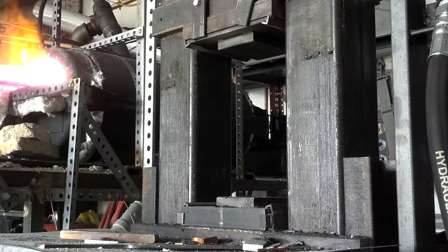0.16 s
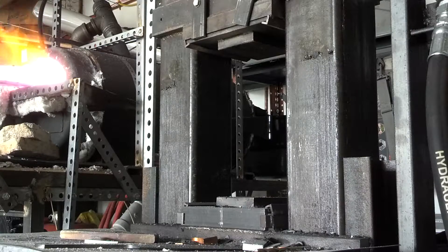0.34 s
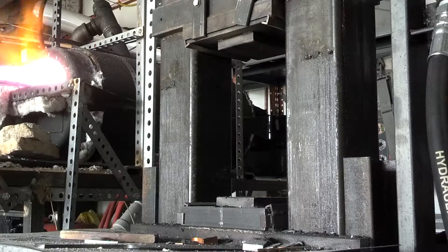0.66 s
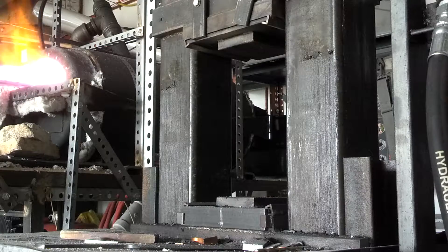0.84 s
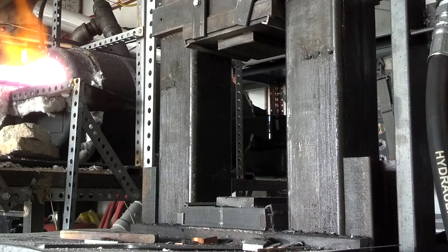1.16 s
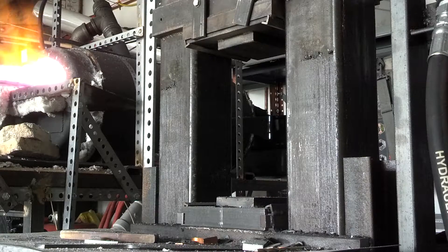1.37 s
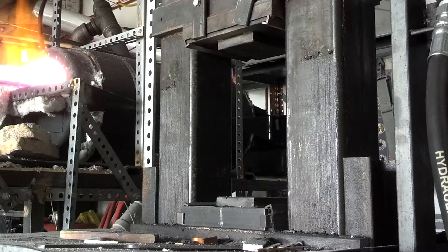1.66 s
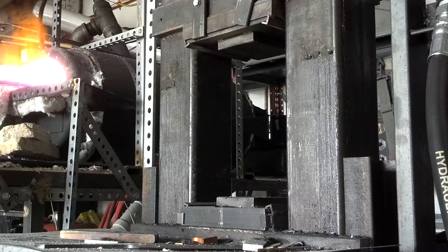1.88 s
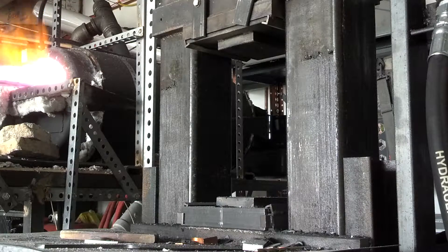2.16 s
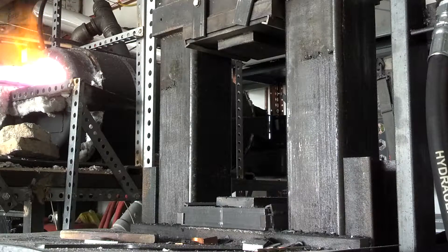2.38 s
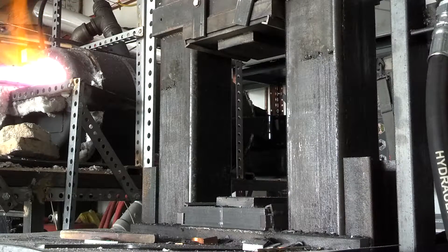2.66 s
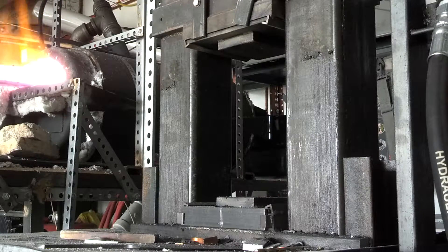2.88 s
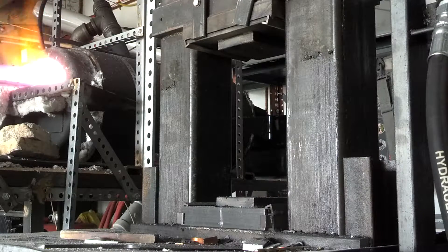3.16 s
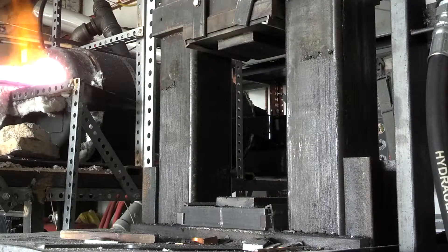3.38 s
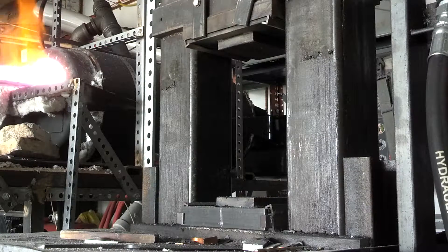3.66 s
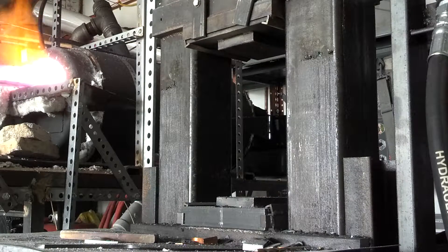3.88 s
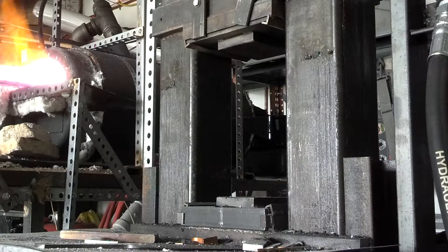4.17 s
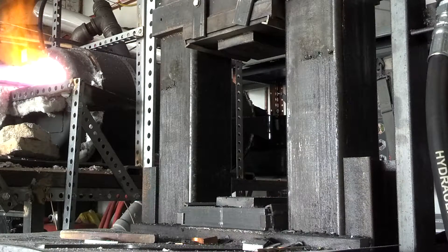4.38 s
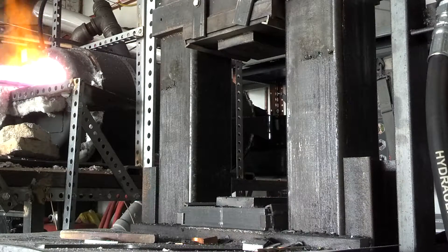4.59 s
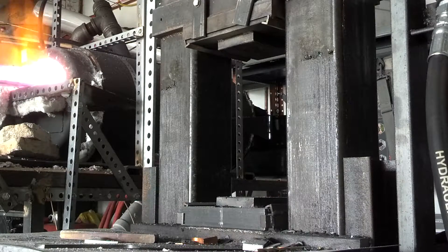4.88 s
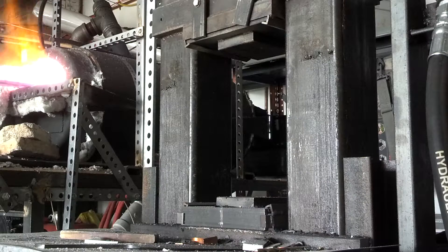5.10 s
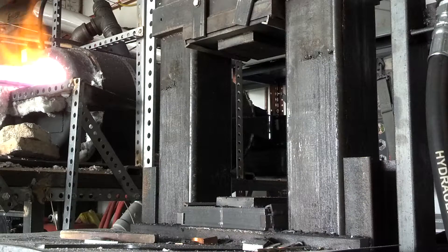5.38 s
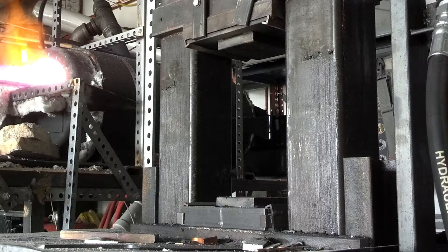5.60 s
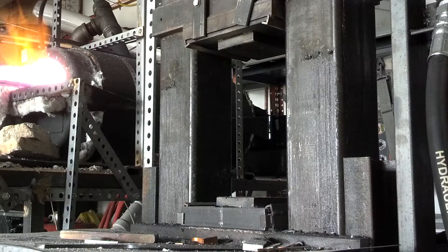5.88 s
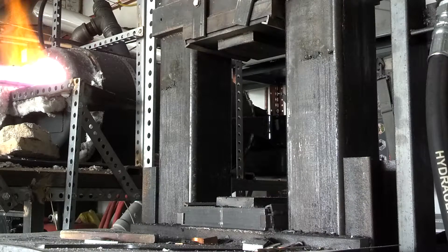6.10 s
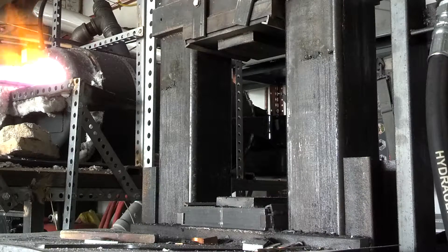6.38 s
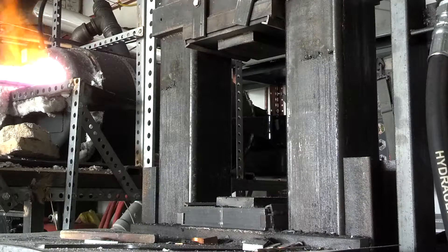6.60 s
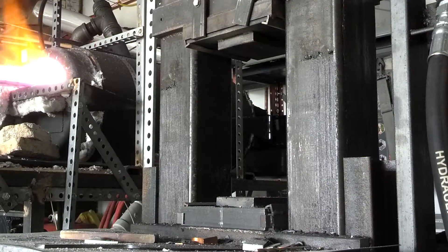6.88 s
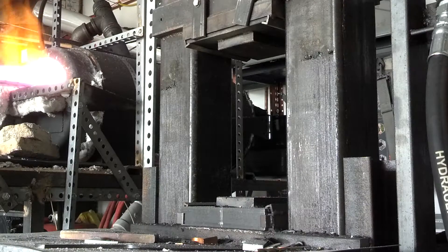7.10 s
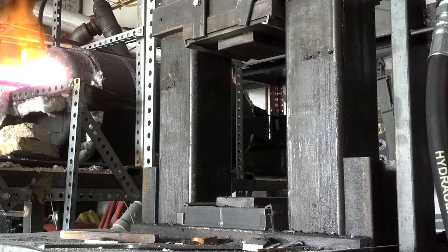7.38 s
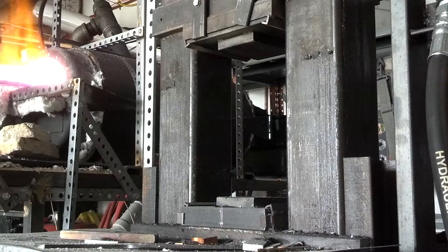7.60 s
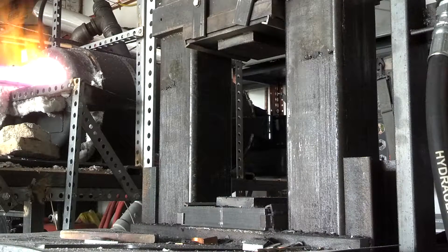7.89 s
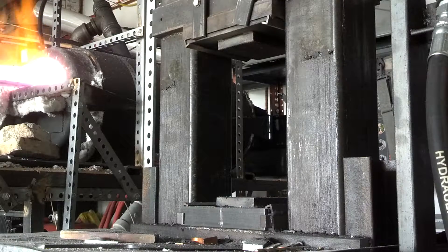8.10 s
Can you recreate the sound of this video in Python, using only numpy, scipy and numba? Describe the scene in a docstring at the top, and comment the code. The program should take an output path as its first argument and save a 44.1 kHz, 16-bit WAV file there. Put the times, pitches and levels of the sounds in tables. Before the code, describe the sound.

A gas forge roars for the whole eight seconds: a dense low boom, hollow with chamber resonances, fluttering quickly, with a thin steady hiss above. Out of sight, a hammer hits hot steel on an anvil, slightly left. Seven blows come from 0.2 to 1.9 s, about 3.6 a second, each a dull thud near 500 Hz with a short clank, a modest crack and a faint thin ring. Weaker, uneven taps follow at 2.4 to 2.7, then three firmer blows at 2.9 to 3.5. After a pause, four strokes run from 4.1 to 5.0. A longer gap lets the roar swell; two light taps fall around 5.9 and 6.0. A last regular run goes from 6.5 to 8.1, with brighter clanks. Small metal chinks colour some hits. Stereo microphones catch short workshop reflections, while automatic gain ducks the roar under loud blows.

```python
"""A gas forge roars in a workshop: coloured noise lifted by chamber resonances booms, its treble hisses.
Over it come runs of sharp hammer blows on hot steel: a dull thud made of sinking swings,
and a clank, a crack and a thin ring made of damped modes and short noise. Light metal ticks and
chinks are bursts of bright noise. An automatic gain control ducks the roar at loud blows
and lets it swell back in the pauses."""
import sys
import numpy as np
from scipy import signal
from scipy.fft import rfft, irfft
from scipy.io import wavfile
from scipy.ndimage import uniform_filter1d
from numba import njit

SR = 44100
rng = np.random.default_rng(int(sys.argv[2]) if len(sys.argv) > 2 else 0)


def generate_wav(signal):
    """Clip the signal to [-1, 1] and save it as 16-bit WAV at the path in sys.argv[1]."""
    frames = np.transpose(np.atleast_2d(signal))
    scaled = np.clip(frames, -1, 1) * 32767
    pcm = np.round(scaled).astype(np.int16)
    wavfile.write(sys.argv[1], SR, pcm)


N = 363825
AGE = np.arange(int(0.6 * SR)) / SR  # seconds since a contact
BODY_S = 0.045  # first moments of a contact, over which its level is set


def undb(db):
    """Decibels to gain."""
    return 10 ** (np.asarray(db) / 20)


def along(table, hz):
    """Read (Hz, value) points on a log-frequency axis."""
    f, value = np.transpose(table)
    return np.interp(np.log(hz + 1), np.log(f), value)


def unit(x):
    """Scale to rms 1."""
    return x / np.sqrt(np.mean(x ** 2))


def pan(db):
    """Left and right gains for a level difference, left minus right in dB."""
    return undb(np.array([[db], [-db]]) / 2)


def walk(rate):
    """Random levels held 1 / rate seconds and smoothed twice; spread near 1."""
    hold = int(SR / rate)
    steps = np.repeat(rng.standard_normal(N // hold + 1), hold)
    smooth = uniform_filter1d(uniform_filter1d(steps, hold), hold)
    return 0.73 * smooth[:N]


def add(out, s, sound):
    """Mix a sound in at a time in seconds."""
    start = int(s * SR)
    out[:, start:start + sound.shape[1]] += sound[:, :N - start]


def bins(size):
    """Frequencies of a spectrum in Hz."""
    return np.arange(size // 2 + 1) * SR / size


# Phase by which the left microphone leads the right.
# Each row: frequency in Hz, phase in radians.
LEFT_LEAD = [(60, -.4), (190, -1.5), (380, 0), (1500, .2), (2000, 3), (2800, 3.4), (3400, 6.1), (4100, 6.6),
             (4700, 9.3), (5100, 9.8), (5800, 12.6), (7000, 15.7), (8500, 18.8)]


def noise_pair(gain, likeness, size):
    """Coloured noise as two spaced microphones hear it: partly alike, the right one shifted in phase."""
    hz = bins(size)
    left, other = rfft(rng.standard_normal((2, size)))
    alike = np.clip(along(likeness, hz), 0, 1)
    right = alike * left + np.sqrt(1 - alike ** 2) * other
    right = right * np.exp(-1j * along(LEFT_LEAD, hz))
    return unit(irfft(np.array([left, right]) * gain, size))


# Broad colour of the flame noise, before resonances.
# Each row: frequency in Hz, relative level in dB per Hz.
FLAME_COLOUR = [(32, -48), (65, -47), (100, -17), (170, -1), (380, -6), (720, -14.5), (1000, -24.5),
                (2000, -30), (3200, -41.5), (4000, -48), (5100, -61.5), (7500, -57.5), (10000, -68),
                (15000, -62)]
# Resonances of the chamber and the shop that lift the flame noise.
# Each row: centre in Hz, width in Hz, lift in dB.
CHAMBER_RESONANCES = [(175.4, 34.5, 8.5), (220, 10.7, 7.5), (240, 8.7, 7.5), (305.3, 15, 10.5),
                      (332.8, 16, 4), (382, 16.3, 9), (414, 11, 7.5), (503, 13, 4), (675, 45, 6.5),
                      (897, 32, 8.5), (1118, 20, 11.5), (1391, 21, 11), (1564, 51, 7), (1947, 24, 8.5),
                      (2116, 22, 12), (2746, 170, 17)]
# Where the forge sits in the stereo field.
# Each row: frequency in Hz, left minus right in dB.
FLAME_SIDES = [(60, 2), (110, 0), (185, 5), (230, 2), (310, 1), (460, 4), (700, -1), (1300, .5), (4400, 0),
               (7500, 4), (12000, 1.5)]
# Likeness of the flame at the two microphones.
# Each row: frequency in Hz, coherence from 0 to 1.
FLAME_COHERENCE = [(60, 1), (200, 0.68), (350, 0.92), (480, 0), (700, 0.89), (1300, 0.98), (1800, 0.47),
                   (2400, 0.99), (3700, 0.72), (5000, 1), (15000, 0)]
# Slow swell of the flame's boom, under its quick flutter.
# Each row: time in seconds, level change in dB.
BOOM_SWELL = [(0, -2), (.5, 0), (1.3, -.5), (2.1, 1), (2.6, 1.5), (3.3, 0), (4.2, 1.5), (4.6, -1.5),
              (5.2, 1), (5.8, .5), (6.6, 1), (7.4, 0.5), (8.25, 0)]


def forge(level_db=-21, flutter_db=1.7, hiss_flutter_db=0.07):
    """Turbulent flame rings the chamber; the boom flutters quickly, the jet's hiss stays nearly steady."""
    hz = bins(N)
    lift = sum(db / (1 + (2 * (hz - f) / width) ** 2) for f, width, db in CHAMBER_RESONANCES)
    sides = np.array([[0.5], [-0.5]]) * along(FLAME_SIDES, hz)
    # broad cut (Hz, dB) that makes room for the resonances
    valleys = along([(90, 2.5), (170, 2.5), (400, 0.5), (2150, 3.0),
                     (2500, 8.0), (3000, 6.5), (3500, -2.0)], hz)
    colour = undb(along(FLAME_COLOUR, hz) + lift - valleys + sides)
    roar = noise_pair(colour, FLAME_COHERENCE, N)
    # split into boom and hiss around 650 Hz
    boom = signal.sosfiltfilt(signal.butter(2, 650, fs=SR, output="sos"), roar)
    swell_db = np.interp(np.arange(N) / SR, *np.transpose(BOOM_SWELL))
    flame = boom * undb(flutter_db * walk(22) + swell_db)
    jet = (roar - boom) * undb(hiss_flutter_db * walk(7.1))
    return undb(level_db) * (flame + jet)


def blow_level(sound, db):
    """Set the rms level of a contact's first moments."""
    return sound * undb(db) / np.sqrt(np.mean(sound[:, :int(BODY_S * SR)] ** 2))


# Likeness of contact noise at the two microphones.
# Each row: frequency in Hz, coherence from 0 to 1.
CONTACT_COHERENCE = [(100, .5), (450, 0.56), (800, 0.54), (1200, 1), (1800, 0.095), (2400, 1), (3700, 0.57),
                     (5500, 0.93), (7500, 0.088), (15000, 0.34)]


def burst(colour, rise_s, t60, room_db, room_t60, patchy_db):
    """Noise standing for many crowded modes: it dies quickly, then lingers in the shop."""
    hz = bins(len(AGE))
    # each contact favours other clusters of modes
    grid = np.linspace(0, SR / 2, 2 ** 8)
    patches = patchy_db * np.interp(hz, grid, rng.standard_normal(len(grid)))
    noise = noise_pair(undb(along(colour, hz) + patches), CONTACT_COHERENCE, len(AGE))
    direct = undb(-60 * AGE / t60)
    room = undb(room_db - 60 * AGE / room_t60)
    rise = 1 - np.exp(-(AGE / rise_s) ** 2)
    return blow_level(rise * np.hypot(direct, room) * noise, 0)


def ring(modes, push_s, scatter_db, detune, stagger):
    """Damped modes build up in a push and swing loosely in step at its end, scattered by stagger in radians."""
    hz, db, t60 = np.transpose(modes)[:, :, None]
    # each blow lands on another spot and shares itself out differently
    size, shift, spread, offset = rng.standard_normal((len(modes), 4)).T[:, :, None]
    phase = 2 * np.pi * hz * (1 + detune * shift) * (AGE - push_s) + stagger * offset
    fade = undb(db + scatter_db * size) * np.exp(-np.log(1000) * AGE / t60)
    # reflections turn each mode a little between the microphones
    right_lag = along(LEFT_LEAD, hz) + 0.4 * spread
    left = (fade * np.sin(phase)).sum(axis=0)
    right = (fade * np.sin(phase - right_lag)).sum(axis=0)
    build_up = 1 - np.exp(-(AGE / push_s) ** 2)
    return blow_level(np.array([left, right]) * build_up, 0)


# Early reflections of the thud from floor and benches.
# Each row: delay in seconds, level in dB.
THUD_REFLECTIONS = [(.0089, -4.5), (.0215, -12), (0.0354, -12.5)]


def bump(hz, peak_s, steepness=9, sag=0.12):
    """The anvil gives under the hammer: a few swings swell, sink in pitch and return from near surfaces."""
    age = AGE / peak_s
    swell = (age * np.exp(1 - age)) ** steepness
    pitch = hz * (1 + sag * np.tanh(1 - age))
    phase = 2 * np.pi * np.cumsum(pitch) / SR
    out = np.zeros(len(AGE))
    for delay_s, db in [(0, 0.0081)] + THUD_REFLECTIONS:
        swings = swell * np.sin(phase + rng.uniform(0, 2 * np.pi))
        out += undb(db) * np.interp(AGE - delay_s, AGE, swings, left=0)
    return blow_level(np.array([out, out]), 0)


# Low modes of the anvil on its stand.
# Each row: frequency in Hz, typical level in dB, 60 dB decay in seconds.
STAND_MODES = [(44, -27.5, 0.084), (413.7, 2, 0.27), (442.3, -2.5, 0.24), (478, -6, 0.064),
               (522.4, 2, 0.14), (558, -0.5, 0.28)]
# Noisy part of the thud.
# Each row: frequency in Hz, relative level in dB per Hz.
THUD_COLOUR = [(30, -36), (150, -26.5), (330, -28), (425, 18), (555, 10), (680, 2.5), (1200, -29),
               (3000, -72)]


def stand_ring():
    """Soft hot steel pushes for some milliseconds, so the stand's low modes come late."""
    modes = ring(STAND_MODES, push_s=0.01054, scatter_db=0.5, detune=0.006, stagger=1.16)
    noise = burst(THUD_COLOUR, rise_s=0.0064, t60=0.041, room_db=-5, room_t60=0.28, patchy_db=0.5)
    return modes + undb(-0.5) * noise


def echo(sound, delay_s, echo_db):
    """Add one reflection from the floor or a wall of the shop."""
    late = [np.interp(AGE - delay_s, AGE, side, left=0) for side in sound]
    return sound + undb(echo_db) * np.array(late)


# Middle modes of the anvil on its stand.
# Each row: frequency in Hz, typical level in dB, 60 dB decay in seconds.
ANVIL_CLANK_MODES = [(641, -12.5, 0.064), (669.3, -6.5, 0.18), (704.4, -6, 0.25), (816.3, 0.5, 0.14),
                     (854.6, -3.5, 0.14), (909, -13, 0.21), (1000, -8, 0.2), (1137, -10, 0.25),
                     (1190, -14, 0.31), (1310, -19, .2), (1306, -20.5, 0.1), (1580, -21, 0.16),
                     (1647, -15, 0.13)]
# Noisy part of the clank.
# Each row: frequency in Hz, relative level in dB per Hz.
CLANK_COLOUR = [(350, -29.5), (620, 1.5), (840, 1.5), (1050, -7), (1250, -6), (1450, -15), (1750, -17),
                (2200, -19.5), (2700, -25.5), (6000, -68.5)]


def clank_ring():
    """The anvil's middle modes clank over dense noise, with one reflection from the shop."""
    clank = ring(ANVIL_CLANK_MODES, push_s=0.007, scatter_db=1.0, detune=0.004, stagger=1.1)
    noise = burst(CLANK_COLOUR, rise_s=0.0045, t60=0.032, room_db=14, room_t60=0.27, patchy_db=0.5)
    return echo(clank + undb(3) * noise, delay_s=0.033, echo_db=-13)


# Noisy part of the crack.
# Each row: frequency in Hz, relative level in dB per Hz.
CRACK_COLOUR = [(900, -10), (1500, 2.5), (2000, 8), (2500, 2), (3000, 7), (3900, 3.5), (4400, -4),
                (5200, 0), (6200, -33.5), (10000, -37), (15000, -50.5)]
# Bright modes that the hammer face sets off.
# Each row: frequency in Hz, typical level in dB, 60 dB decay in seconds.
FACE_MODES = [(2170, 14, 0.2), (2915, 5.5, 0.45), (3000, 3, 0.36), (3675, 1.5, 0.36), (3746, 0, 0.38),
              (3900, -1, 0.32), (4270, -2, 0.28), (4460, -3.5, 0.14), (4740, -5.5, 0.15)]


def crack_ring():
    """The hammer face sets off a sharp noise and bright modes."""
    noise = burst(CRACK_COLOUR, rise_s=0.0035, t60=0.03, room_db=7, room_t60=0.36, patchy_db=2)
    modes = ring(FACE_MODES, push_s=0.003, scatter_db=4, detune=0.006, stagger=1.5)
    return noise + undb(-2) * modes


# Noisy part of the thin ring.
# Each row: frequency in Hz, relative level in dB per Hz.
THIN_COLOUR = [(4400, -21.5), (5500, 4), (7700, 2.5), (8800, -5.5), (11500, -12), (15000, -23)]
# Highest modes of the anvil on its stand.
# Each row: frequency in Hz, typical level in dB, 60 dB decay in seconds.
THIN_MODES = [(5320, 5, 0.43), (6660, 0.5, 0.34), (7260, 2.5, 0.24), (7560, -2, 0.22), (8220, 0, 0.25),
              (9900, -9, 0.3), (10800, -7.5, .33), (11400, -9, 0.36)]


def thin_ring():
    """A sizzle of treble noise with the anvil's highest modes ringing in it."""
    noise = burst(THIN_COLOUR, rise_s=0.0037, t60=0.014, room_db=-7.0, room_t60=0.35, patchy_db=2.0)
    modes = ring(THIN_MODES, push_s=0.002, scatter_db=4, detune=0.004, stagger=1.5)
    return noise + undb(-5) * modes


def anvil():
    """The four ringing parts of one stroke on the anvil, from low to high."""
    return np.array([stand_ring(), clank_ring(), crack_ring(), thin_ring()])


def tilt(sound, slope_db):
    """Brighten or dull a sound, in dB per octave between 600 and 1250 Hz, level outside."""
    octaves = np.log2(np.clip(bins(len(AGE)), 600, 1250) / 1000)
    return irfft(rfft(sound) * undb(slope_db * octaves), len(AGE))


def uneven_decay(sound, depth_db, rate_hz):
    """Random level flutter makes the decay of a blow lumpy."""
    onset = np.minimum(AGE / BODY_S, 1)
    return sound * undb(depth_db * walk(rate_hz)[:len(AGE)] * onset)


# Hammer blows, in runs of about 3.6 a second; levels are those before panning.
# Each row: start in seconds, thud level in dB, thud pitch at its peak in Hz, time to that peak in seconds,
# clank level in dB, clank brightness in dB per octave, crack level in dB, thin ring level in dB.
HAMMER_BLOWS = [(0.171, -16.5, 506, 0.017, -15.5, -2, -39.5, -57),
                (0.473, -12.5, 513, .013, -15, -1, -34, -50),
                (0.781, -14, 509, 0.013, -18.5, -3.5, -44, -57.5),
                (1.062, -11, 506, .014, -13, -2.5, -34.5, -51.5),
                (1.333, -13, 514, 0.015, -13.5, 2.5, -28.5, -48.5),
                (1.621, -15, 511, 0.013, -16.5, -5, -37.5, -56),
                (1.916, -17, 502, .010, -20, 4.5, -37, -56.5), (2.360, -22, 450, 0.017, -32, 3, -50.5, -67),
                (2.626, -23.5, 450, 0.02, -28.5, 12, -36.5, -53.5),
                (2.714, -30, 460, .016, -24, 1, -51, -69),
                (2.932, -14, 453, 0.013, -19.5, -3, -39.5, -52.5),
                (3.206, -16, 440, .011, -23, -2.5, -42.5, -55.5),
                (3.479, -17.5, 458, .009, -22.5, 0.5, -41.5, -55),
                (4.124, -19.5, 482, 0.01, -28, 5, -42.5, -62.5),
                (4.418, -12.5, 477, 0.01, -16.5, 3, -31.5, -51.5),
                (4.691, -16, 500, 0.013, -16, -0.5, -33, -55),
                (4.971, -17, 517, 0.012, -21.5, -0.5, -48.5, -59.5),
                (5.890, -22, 483, .011, -25.5, 2.5, -48.5, -62),
                (6.040, -28, 503, .008, -25.5, -15.5, -51, -60),
                (6.484, -16, 478, 0.012, -27, 0.5, -44, -54),
                (6.779, -15.5, 508, .013, -17, -6, -38.5, -52),
                (7.047, -22, 487, 0.014, -18, -1.5, -28, -49),
                (7.309, -19.5, 497, .012, -17.5, 3, -42, -54.5),
                (7.572, -18.5, 512, .012, -13.5, 4, -33.5, -49.5),
                (7.823, -16.5, 488, 0.011, -16.5, 0.5, -29.5, -47.5),
                (8.086, -18, 502, .013, -15, 0, -31.5, -52)]
# How alike the sounds stay from blow to blow.
# In order: stand, clank, crack and thin ring, each from 0 to 1.
BLOW_SAMENESS = (.6, .6, .3, .2)


def hammer(stand_db=-4):
    """Every blow sets off the same anvil in the same shop, and differs with the spot where it lands."""
    out = np.zeros((2, N))
    usual = anvil()
    alike = np.clip(BLOW_SAMENESS, 0, 1)[:, None, None]
    for s, thud_db, thud_hz, peak_s, clank_db, slope_db, crack_db, thin_db in HAMMER_BLOWS:
        stand, clank, crack, thin = alike * usual + np.sqrt(1 - alike ** 2) * anvil()
        thud = bump(thud_hz, peak_s) + undb(stand_db) * stand
        # every part leans left, the thin ring most
        blow = pan(5) * blow_level(thud, thud_db)
        blow += pan(2) * blow_level(tilt(clank, slope_db), clank_db)
        blow += pan(1) * blow_level(crack, crack_db)
        blow += pan(12) * blow_level(thin, thin_db)
        add(out, s, uneven_decay(blow, depth_db=1.7, rate_hz=170))
    return out


# Light, bright ticks and chinks of metal, alone or with a blow; levels are those before panning.
# Each row: start in seconds, level in dB, centre in Hz, half width in octaves.
METAL_TICKS = [(0.443, -53, 10900, 1), (0.659, -60.5, 8400, 0.6), (1.334, -37.5, 3630, 0.14),
               (2.628, -48, 5500, 0.22), (3.48, -50.5, 8100, 0.78), (4.355, -61, 8350, 0.55),
               (4.692, -39.5, 3750, .15), (4.855, -68, 8500, .5), (6.044, -54.5, 7700, .6),
               (6.485, -53, 5500, 0.24), (7.049, -50, 7550, .08), (7.574, -52, 7500, .08),
               (7.826, -46, 7530, 0.11)]
# How much louder small contacts are on the left.
# Each row: frequency in Hz, left minus right in dB.
TICK_SIDES = [(3700, 2), (5500, 3), (7500, 11), (11000, 7)]


def ticks(skirt_db=-17, body_db=-42):
    """Light metal contacts, each with its own patch of treble; the narrow ones chink."""
    out = np.zeros((2, N))
    for s, tick_db, hz, octaves in METAL_TICKS:
        edge = 2 ** abs(octaves)
        colour = [(hz / edge ** 3, body_db), (hz / edge, skirt_db), (hz, 0),
                  (hz * edge, skirt_db), (hz * edge ** 3, body_db)]
        tick = burst(colour, rise_s=0.0015, t60=0.014, room_db=-6.5, room_t60=0.29, patchy_db=3.5)
        add(out, s, undb(tick_db) * pan(along(TICK_SIDES, hz)) * tick)
    return out


def scene():
    """The forge, the hammering and the small ticks."""
    return forge() + hammer() + ticks()


@njit
def follow(x, attack, release, start):
    """Envelope that rises quickly and sinks slowly."""
    out, e = np.empty(len(x)), start
    for i in range(len(x)):
        e += (x[i] - e) * (attack if x[i] > e else release)
        out[i] = e
    return out


def record(dry, knee_db=-15.5, squeeze=0.74, attack_s=0.0084, release_s=0.56, start_db=-12.0):
    """Gain control, already turned down at first, ducks at loud blows and recovers slowly; the top is cut."""
    loudest = np.abs(dry).max(axis=0)
    envelope = follow(loudest, 1 / (attack_s * SR), 1 / (release_s * SR), float(undb(start_db)))
    gain = np.maximum(envelope / undb(knee_db), 1) ** -squeeze
    # steep low-pass at 15550 Hz
    top_cut = signal.ellip(10, 0.2, 80, 15550, fs=SR, output="sos")
    return signal.sosfilt(top_cut, dry * gain)


dry = scene()
out = record(dry)
generate_wav(out)
```